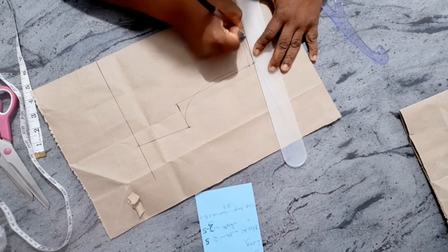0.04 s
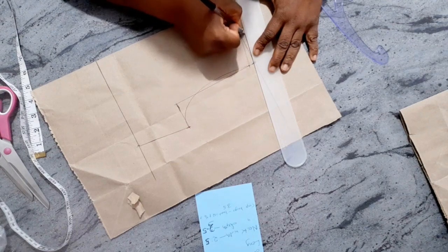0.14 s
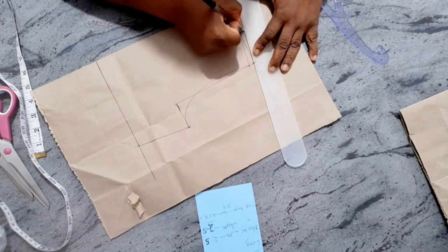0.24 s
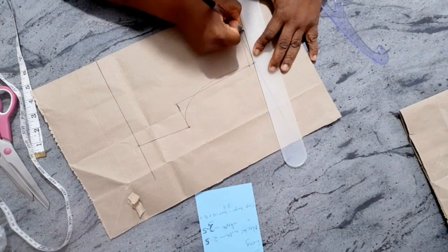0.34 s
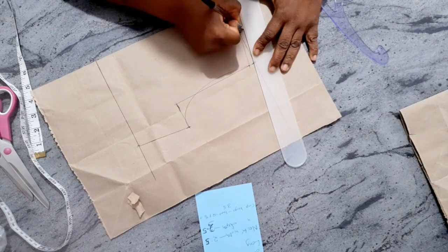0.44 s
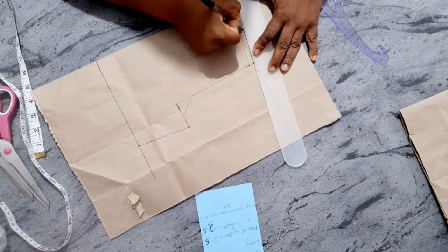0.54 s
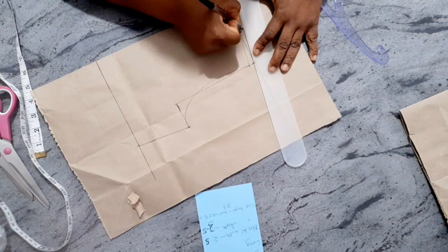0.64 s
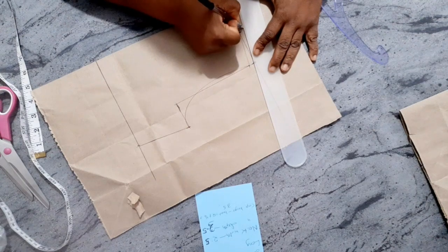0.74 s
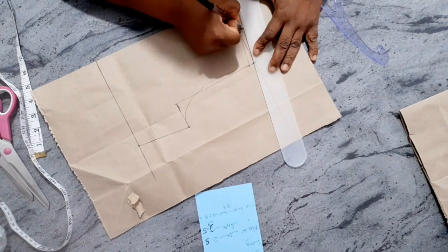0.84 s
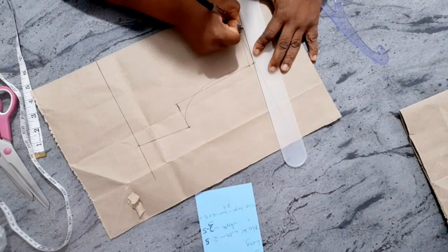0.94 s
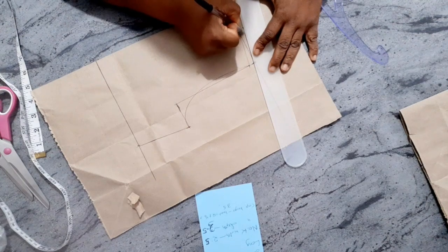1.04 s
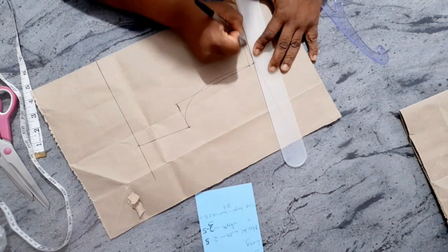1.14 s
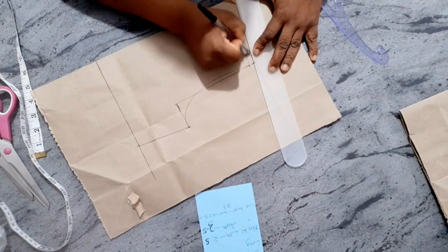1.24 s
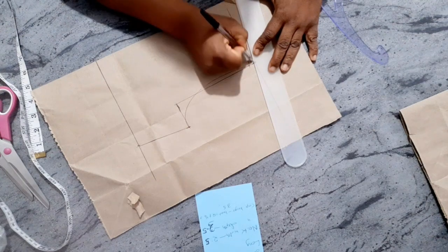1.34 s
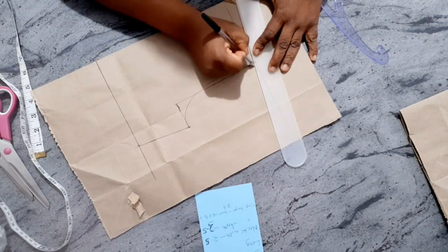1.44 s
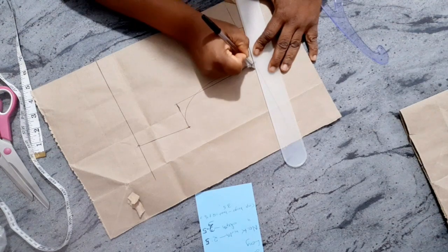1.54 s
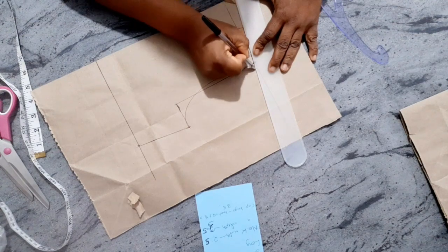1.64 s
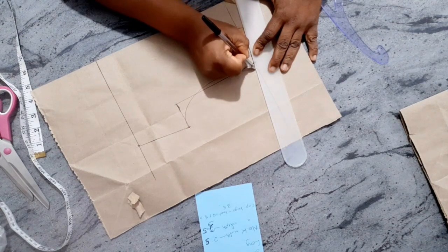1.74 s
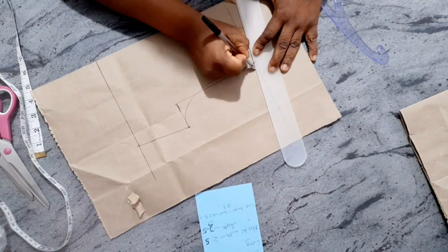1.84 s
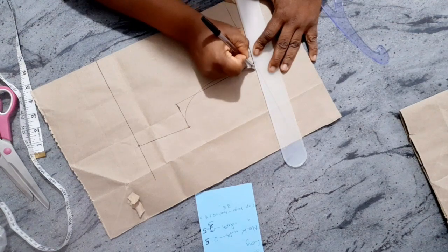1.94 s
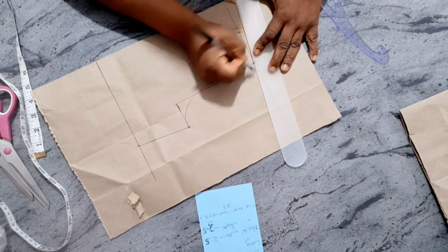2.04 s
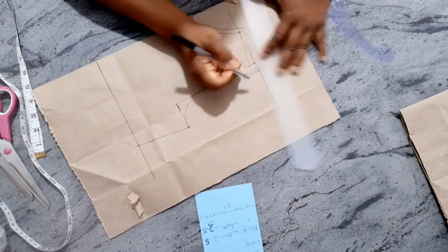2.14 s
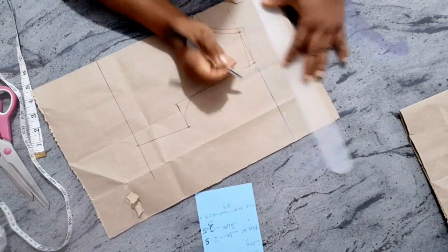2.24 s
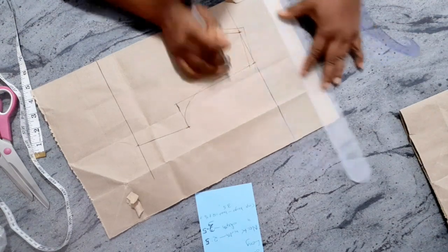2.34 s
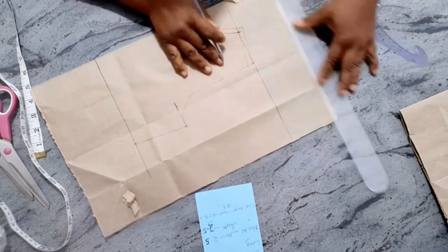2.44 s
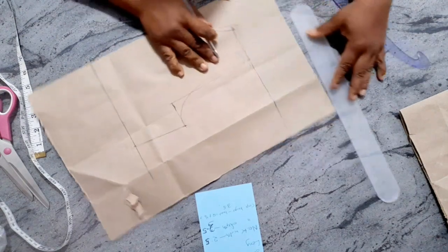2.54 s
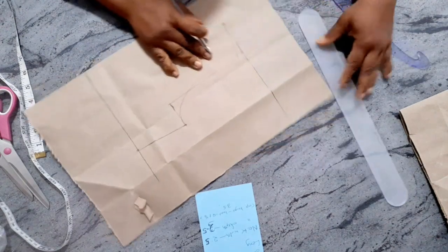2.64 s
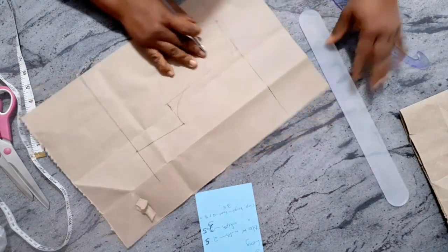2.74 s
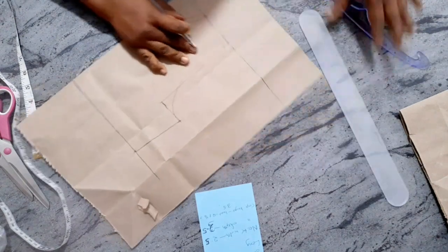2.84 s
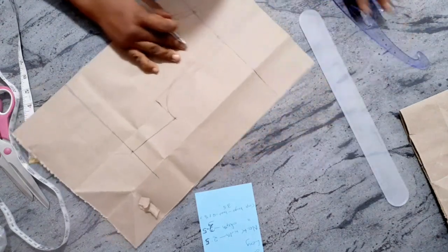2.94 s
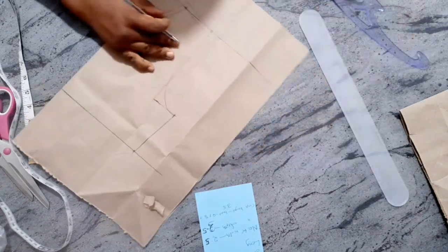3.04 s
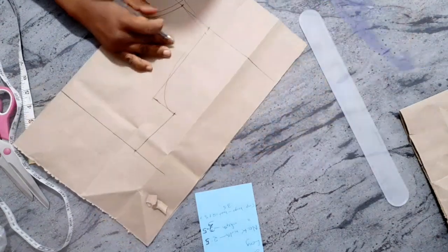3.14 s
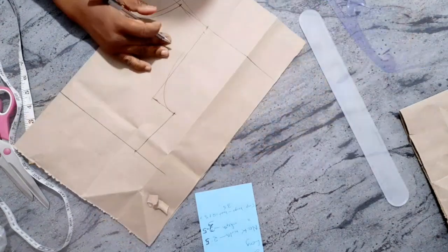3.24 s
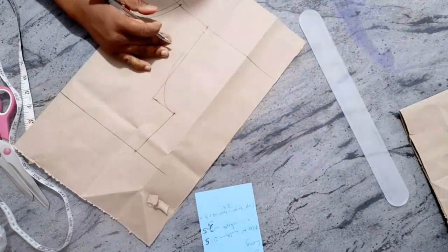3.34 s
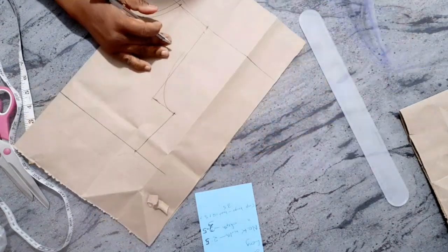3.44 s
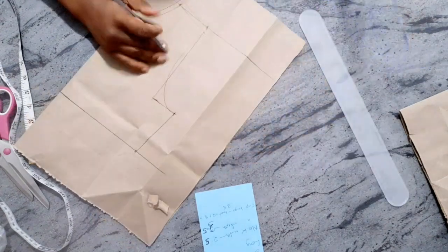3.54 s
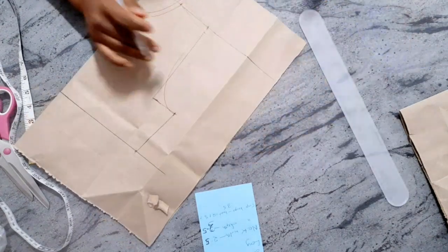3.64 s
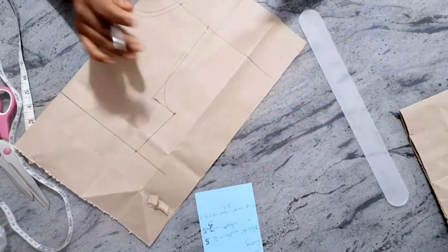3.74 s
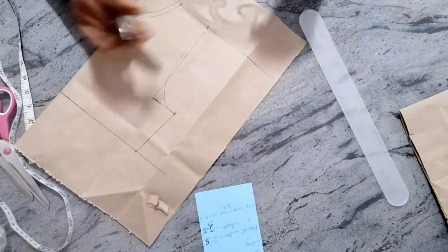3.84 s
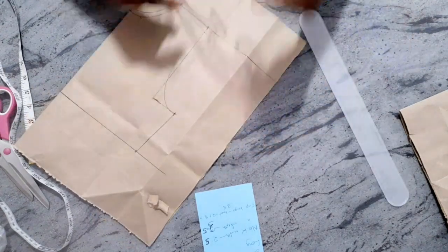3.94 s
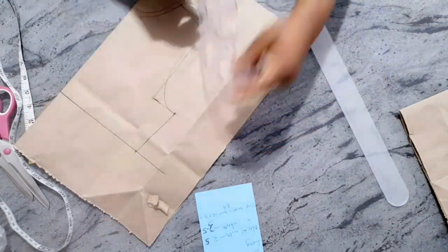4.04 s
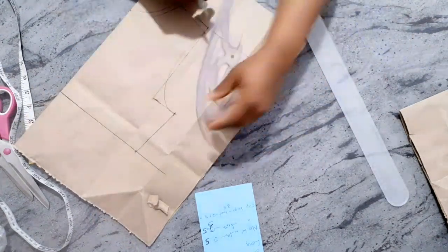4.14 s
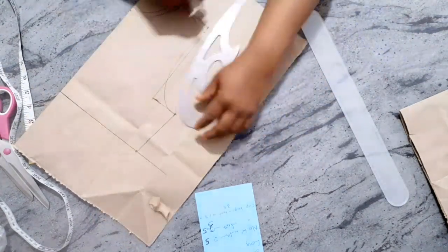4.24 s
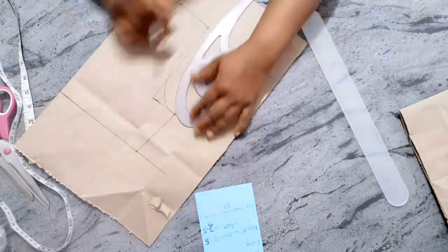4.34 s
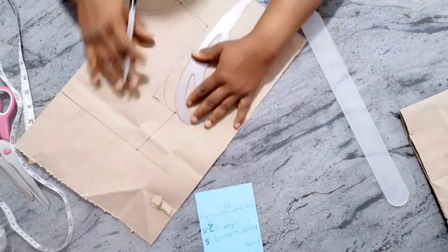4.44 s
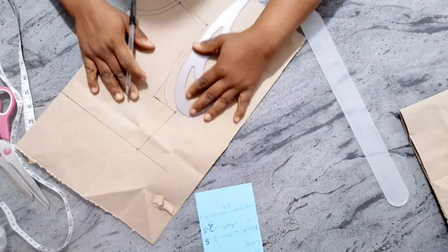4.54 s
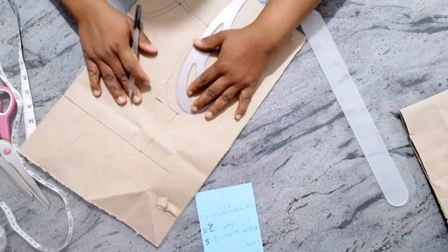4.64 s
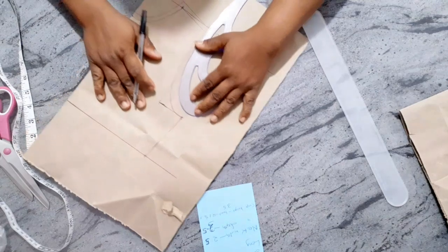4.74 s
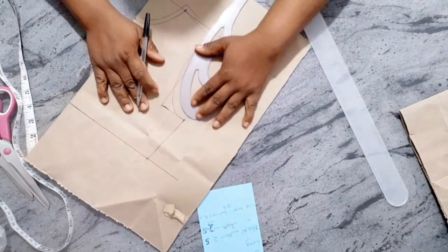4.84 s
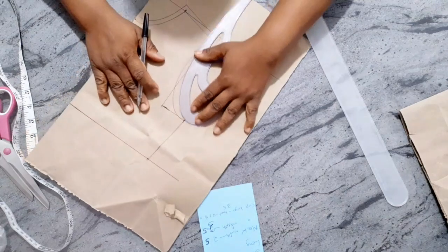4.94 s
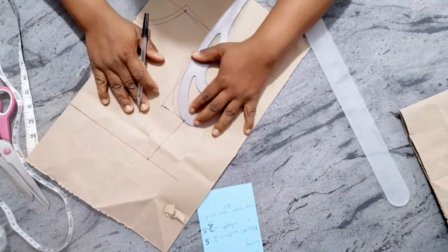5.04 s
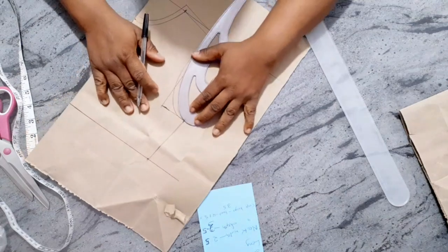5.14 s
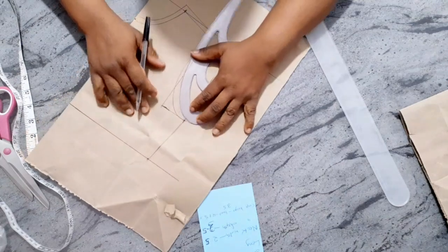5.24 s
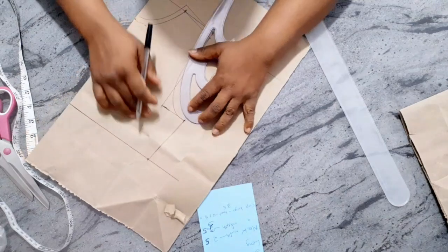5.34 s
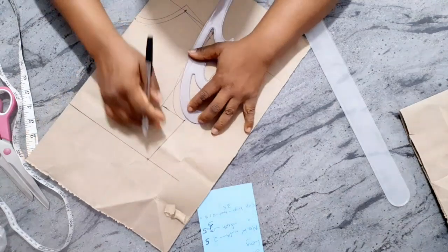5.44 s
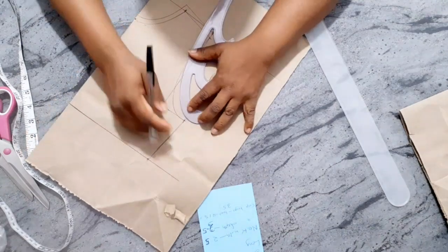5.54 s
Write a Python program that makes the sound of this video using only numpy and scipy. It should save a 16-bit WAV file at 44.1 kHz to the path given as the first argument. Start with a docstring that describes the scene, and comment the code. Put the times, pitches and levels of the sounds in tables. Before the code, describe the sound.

The sound is close, just above a stone table in a small room with faint steady background noise. After tiny paper and hand rubs, a pen draws along a ruler from about 1 to 1.6 seconds, a quiet, low scratch with soft thumps of a leaning hand. At 2.1 seconds brown paper starts sliding, with a crisp flick at 2.25, a brief ruler scrape and light knocks around 2.4 to 2.6. The rustle fades just after 3 seconds. Faint ticks and a small knock come near 3.5 and 3.7. From 4.15 to 4.3 seconds a plastic drawing curve lands on its edge, rattles and slaps flat, a bright clack and by far the loudest event. A cluster of duller knocks follows at 4.5, then a soft palm pat at 4.7. Hands gently smooth the paper, with one light pen click at 5.4 seconds.

```python
"""Pattern drafting on a stone table

A pen draws along a ruler, the ruler is pushed off, and hands turn and smooth the brown paper.
All this is stick-slip friction: dense tiny impulses, filtered by the bodies that they excite.
Pen and ruler knock lightly; loudest of all, a plastic curve clacks down and rings in its modes.
The scene is heard from just above the table, with the reverberation of a small room."""
import sys
import numpy as np
from scipy import signal
from scipy.fft import rfft, irfft, next_fast_len
from scipy.io import wavfile
from scipy.ndimage import uniform_filter1d

SR = 44100
rng = np.random.default_rng(int(sys.argv[2]) if len(sys.argv) > 2 else 0)


def bounce(signal):
    """Save signal as a 16-bit WAV file at the path given by the first command-line argument."""
    frames = np.transpose(np.atleast_2d(signal))
    limited = np.clip(frames, -1, 1)
    pcm = np.round(limited * 32767).astype(np.int16)
    wavfile.write(sys.argv[1], SR, pcm)


N = 246078
TIME = np.arange(N) / SR

# Spectral shapes, each normalised in use: (frequency [Hz], relative level [dB])
AIR_SPECTRUM = [(25, -19), (69, -12.5), (101, 3.5), (164, -11), (204, -3), (400, -7.5), (900, -11),
                (1710, -24.5), (2600, -21.5), (7500, -25), (9500, -33.5), (12500, -22), (15500, -24.5)]  # steady noise of the room
REVERB_SPECTRUM = [(60, 0.5), (280, -3.5), (600, 5.5), (2500, 4.5), (8000, 5.5), (15000, -9)]  # sound returned by the walls
HAND_SPECTRUM = [(40, -25.5), (75, -12), (130, -2.5), (200, -4.5), (340, -1.5), (480, -10.5), (700, -13),
                 (1300, -14.5), (4000, -56)]  # skin rubbing on the table
PALM_SPECTRUM = [(80, -13), (220, -18), (340, 4), (460, -11), (650, 5), (1100, -16), (4000, -31)]  # a palm striking paper
DRAG_SPECTRUM = [(30, -3), (65, 4), (130, 5), (170, -9), (220, 4.5), (500, 0), (750, -2), (1050, -3.5),
                 (1500, -11), (3000, -35)]  # rumble of the moving pen
TIP_SPECTRUM = [(1000, -10), (2200, 2.5), (4000, 2), (7500, 0.5), (9500, -1.5), (13000, 0), (15500, -3)]  # hiss at its tip
RUSTLE_SPECTRUM = [(700, -37), (1700, -11), (2500, 0.5), (4400, 2), (6000, -1), (8000, -3.5), (10000, -46),
                   (15500, -26)]  # the paper's surface
FIBRE_SPECTRUM = [(4000, -63.5), (7000, 0), (8500, 2), (10000, 0), (13000, 3.5), (15500, -4)]  # its fibres
CREASE_SPECTRUM = [(250, -16), (450, -5), (750, -2), (1050, -2.5), (1500, 0), (2100, -3), (3500, -22.5)]  # its folds
KNOCK_SPECTRUM = [(60, -23), (200, -21.5), (420, -17), (700, -12), (1100, -7.5), (1700, -4.5), (2700, -1.5),
                  (4000, -3.5), (7800, -8.5), (9500, -8), (15500, -36)]  # small objects touching the table
EDGE_SPECTRUM = [(60, -38), (250, -7), (550, -14), (1000, -12), (1800, 1.5), (2500, -11), (4300, 3.5),
                 (5500, 1), (7200, 2.5), (9500, 2), (13500, 5), (15500, -2)]  # the curve striking on its edge
FLAT_SPECTRUM = [(60, -7), (500, -5), (1800, 0.5), (2300, 13.5), (2900, 8), (4000, 7.5), (5000, -7),
                 (6400, 2), (8000, 7.5), (9200, -3), (11500, 3.5), (13300, 10), (14500, 1.5), (15500, -11)]  # the curve striking flat

# Resonances driven by friction: (frequency [Hz], bandwidth [Hz], relative level [dB])
BARREL_MODES = [(2670, 160, -2), (3740, 160, -3)]
RULER_BODY_MODES = [(332, 20, -7), (379, 18, 0), (431, 16, -9)]
RULER_EDGE_MODES = [(1153, 16, -0.5), (1440, 150, -20), (2515, 120, -1), (2820, 94, -7), (3230, 100, -15)]
# Modes of the plastic curve: (frequency [Hz], level struck on edge [dB], level struck flat [dB])
PLASTIC_MODES = [(850, -14, -24), (1184, -7, -15), (1335, -5, -18), (1614, -12, -14), (1873, -8, -17),
                 (2262, -13, 0), (2420, -16, -4), (2612, -12, -3), (2905, -12, 1), (3286, -3, -8),
                 (3596, -12, -9), (3836, -10, -4), (4112, -5, -10), (4306, -2, -14), (4608, -4, -22),
                 (6352, 1, -10), (6414, -8, -7), (6842, -1, -13), (7149, -3, -13), (7745, 0, -4),
                 (8110, -8, -8), (8292, -2, -11), (8695, -6, -13), (9960, -5, -13), (10486, -12, -11),
                 (10890, -5, -14), (11217, -2, -16), (11864, -6, -14), (13242, -10, -9), (13470, -4, -9)]

# Sliding movements: (time [s], duration [s], level [dB])
HAND_SHIFTS = [(-.06, 0.15, -56.5), (.2, 0.11, -61), (1.5, .14, -60.5), (1.75, .3, -62),
               (2.15, 0.49, -55.5), (2.96, .14, -51.5), (3.2, 0.15, -56), (3.62, 0.11, -61),
               (4.0, 0.077, -59.5), (4.25, 0.31, -53), (4.66, 0.096, -47.5), (4.9, 0.097, -60),
               (5.1, 0.4, -57.5)]  # hands shift their weight
PEN_MARKS = [(.16, 0.12, -72), (.48, .12, -73), (.72, 0.11, -70), (1.88, .13, -68)]  # small marks before and after the long line
# Soft impacts: (time [s], level [dB])
HAND_LEANS = [(1.071, -43), (1.251, -41), (1.327, -37.5), (3.007, -38.5)]  # a hand leans on the table
PALM_PATS = [(4.7, -43), (4.718, -41.5)]  # a palm pats the sheet
# The long line drawn along the ruler: (time [s], relative drag level [dB], relative hum level [dB])
PEN_LINE = [(0.98, -77, -68), (1.078, -54, -50.5), (1.202, -51, -42), (1.29, -46, -44), (1.31, -47.5, -46),
            (1.496, -60.5, -59), (1.512, -65, -72), (1.58, -68, -61)]
# Slides of the sheet: (time [s], duration [s], level [dB], fibre offset [dB], crease offset [dB])
PAPER_SLIDES = [(-.06, 0.14, -67, -7, -4), (0.6, .08, -72, -4, -20), (0.88, 0.063, -71.5, 2, -20),
                (2.0, 0.14, -65.5, -4, 0), (2.092, 0.21, -37, -3.5, -10.5), (2.302, 0.23, -37.5, -6, -1.5),
                (2.528, 0.31, -38, -5.5, -8), (2.804, .16, -39, -8, -7.5), (2.991, .14, -48.5, -12, 1),
                (3.182, 0.075, -54, -4, 6.5), (3.312, .06, -59, -4, 0), (3.522, 0.066, -53, -3, -5),
                (3.69, 0.14, -68.5, 0.5, -2), (4.001, 0.037, -48.5, -5, -16), (4.38, 0.25, -49, -5.5, -1.5),
                (4.605, 0.15, -42.5, -6.5, -3.5), (4.904, 0.082, -55.5, -6, -9.5),
                (5.133, 0.33, -57.5, -6.5, -6.5), (5.39, .17, -56, -4.5, -0.5)]
# Pen, ruler and fingers knock: (time [s], level [dB], contact cut-off [Hz], 60 dB decay time [s])
LIGHT_KNOCKS = [(1.65, -44.5, 700, .08), (2.091, -38, 4000, 0.061), (2.368, -25, 2500, 0.049),
                (2.526, -29, 2000, 0.025), (2.55, -21, 1960, .034), (3.651, -26.5, 1700, 0.055),
                (3.706, -40.5, 3000, .04), (4.012, -45, 9000, .05), (4.02, -37.5, 6000, .04),
                (4.512, -22, 1200, 0.11), (4.5315, -14, 2000, 0.051), (4.543, -22, 1500, .048),
                (4.5523, -18, 2600, 0.05), (4.616, -31.5, 3000, .02), (5.402, -20, 8150, 0.046)]
# The curve is picked up, then lands:
# (time [s], level [dB], flatness [0 on edge, 1 flat], contact cut-off [Hz])
CURVE_IMPACTS = [(3.462, -34, 0.1, 4500), (3.476, -31, 0.1, 4680), (4.1542, -15.5, 0.035, 17000),
                 (4.1569, -15.5, 0.05, 15000), (4.1654, -7, 0.1, 17100), (4.174, -13.5, 0.1, 9000),
                 (4.2206, -11.5, 0.23, 5870), (4.2488, -10, 0.19, 1690), (4.2704, -8, 0.92, 18100)]


def undb(db):
    """Amplitude ratio of a level in decibels."""
    return 10 ** (np.asarray(db) / 20)


def unit(x):
    """Normalisation to an rms of 1."""
    return x / np.sqrt(np.mean(x ** 2))


def decay(t, t60):
    """Exponential damping: 60 dB down after t60 seconds."""
    return np.exp(-np.log(1000) * t / t60)


def add(track, start_s, sound):
    """Superposition of a short sound on a stereo track."""
    start = int(start_s * SR)
    track[:, start:start + sound.shape[-1]] += sound[..., :N - start]


def colour(x, spectrum):
    """Minimum-phase filtering to a given spectral shape; white noise keeps its power."""
    size = next_fast_len(x.shape[-1] // 2 + 2048) * 2
    hz, db = np.transpose(spectrum)
    bin_hz = np.fft.rfftfreq(size, 1 / SR)
    gain = unit(undb(np.interp(np.log(bin_hz + 1), np.log(hz), db)))
    cepstrum = irfft(np.log(gain))
    cepstrum[1:size // 2] *= 2  # folding the cepstrum makes the filter causal
    cepstrum[size // 2 + 1:] = 0
    return irfft(rfft(x, size) * np.exp(rfft(cepstrum)))[..., :x.shape[-1]]


def soften(x, cutoff_hz, order=2):
    """Contact time acts as a low-pass filter: a softer contact lasts longer and loses treble."""
    return signal.sosfilt(signal.butter(order, cutoff_hz, fs=SR, output="sos"), x)


def resonate(force, modes):
    """Forced vibration: the responses of parallel resonators, summed and scaled to an rms of 1."""
    return unit(sum(undb(db) * signal.lfilter(*signal.iirpeak(hz, hz / width, SR), force)
                    for hz, width, db in modes))


def fluctuation(rate_hz):
    """Random modulation: Gaussian values joined by ramps, with an rms of 1."""
    step = max(int(SR / rate_hz), 1)
    held = np.repeat(rng.standard_normal(N // step + 1), step)[:N]
    return unit(uniform_filter1d(held, step))


def stereo(noises, correlation):
    """Partial coherence: of three noises, one is common to both channels and two are independent."""
    return np.sqrt(correlation) * noises[0] + np.sqrt(1 - correlation) * noises[1:]


def noise_burst(t, t60, correlation):
    """The dense, damped response to an impact, treated as decaying stereo noise."""
    return stereo(rng.standard_normal((3, len(t))), correlation) * decay(t, t60)


def friction(slips_per_s, spread_db, judder_db, judder_hz, correlation):
    """Stick-slip friction: random impulses of uneven size, modulated by the judder of the hand."""
    slips = rng.standard_normal((3, N)) * (rng.random((3, N)) < slips_per_s / SR)
    sizes = undb(spread_db * np.minimum(rng.exponential(size=(3, N)), 4))
    judder = undb(judder_db * fluctuation(judder_hz))
    return unit(stereo(slips * sizes, correlation) * judder)


def movement(start_s, length_s, attack_share=0.42, release_ratio=3.79):
    """Envelope of a slide: it gathers speed, holds and dies away, more slowly the longer it is."""
    attack = np.clip((TIME - start_s) / (attack_share * length_s), 0, 1) ** 2
    release = decay(np.maximum(TIME - start_s - length_s, 0), release_ratio * length_s)
    return attack * release


def movements(rows):
    """Incoherent addition: the envelopes of several slides add in power."""
    return np.sqrt(sum((undb(db) * movement(start, length)) ** 2 for start, length, db in rows))


def room_tone(level_db=-60.5):
    """Diffuse background noise: long waves reach both channels alike, short waves do not."""
    mid, side = colour(rng.standard_normal((2, N)), AIR_SPECTRUM)
    side = signal.sosfilt(signal.butter(1, 600, "high", fs=SR, output="sos"), side)
    gain = undb(level_db + 0.26 * fluctuation(8.8))
    return gain * (mid + undb(1.0) * side * np.array([[1], [-1]]))


def room(x, wet_db, t60=0.45):
    """Reverberation: wall reflections follow the direct sound as a separate tail in each channel."""
    t = TIME[:int(SR * .7)]
    tail = rng.standard_normal((2, len(t))) * decay(t, t60) * (t > .005)
    echoes = undb(wet_db) * colour(unit(tail), REVERB_SPECTRUM) / np.sqrt(len(t))
    direct = np.array([np.pad(x[0], (3, 0))[:N], x[1]])  # reaches the right channel first
    return direct + signal.fftconvolve(x, echoes, axes=1)[:, :N]


def hands(table_hz=133.7, table_t60=0.18):
    """Skin rubs by friction, and a leaning hand sets one low mode of the table in free vibration."""
    slips = friction(1500, spread_db=1.0, judder_db=2.5, judder_hz=30, correlation=0.9)
    out = movements(HAND_SHIFTS) * colour(slips, HAND_SPECTRUM)
    t = TIME[:SR // 2]
    soft_onset = 1 - decay(t, 0.028)
    boom = np.sin(2 * np.pi * table_hz * t) * decay(t, table_t60) * soft_onset
    for start, db in HAND_LEANS:
        add(out, start, undb(db) * boom)
    return out


def palm_pats():
    """A compliant impact, flesh on paper, excites mainly low frequencies: a short, dull puff."""
    out, t = np.zeros((2, N)), TIME[:SR // 3]
    for start, db in PALM_PATS:
        puff = colour(noise_burst(t, t60=0.17, correlation=0.99), PALM_SPECTRUM)
        add(out, start, undb(db) * puff)
    return out


def pen_marks():
    """Faint friction at the tip drives the resonances of the pen's barrel."""
    slips = friction(2800, spread_db=2.5, judder_db=0.5, judder_hz=22, correlation=0.66)
    return movements(PEN_MARKS) * resonate(slips, BARREL_MODES)


def pen_stroke(drag_gain_db=5, hiss_gain_db=-1, hum_gain_db=1.5):
    """Friction of the ballpoint on paper over stone rumbles, hisses and drives the ruler's modes."""
    times, drag_db, hum_db = np.transpose(PEN_LINE)
    drag_slips = friction(4000, spread_db=-0.5, judder_db=0.7, judder_hz=60, correlation=0.83)
    tip_slips = friction(20000, spread_db=1.5, judder_db=1.6, judder_hz=110, correlation=0.13)
    ruler_slips = friction(5600, spread_db=2.0, judder_db=1.5, judder_hz=70, correlation=1.0)
    rumble = undb(drag_gain_db) * colour(drag_slips, DRAG_SPECTRUM)
    hiss = undb(hiss_gain_db) * colour(tip_slips, TIP_SPECTRUM)
    drag = undb(np.interp(TIME, times, drag_db)) * (rumble + hiss)
    hum = undb(np.interp(TIME, times, hum_db) + hum_gain_db) * resonate(ruler_slips, RULER_BODY_MODES)
    drawing = (TIME > times[0]) & (TIME < times[-1])
    return drawing * (drag + hum)


def ruler_scrape(hum_db=-41.5, chatter_db=-33.5):
    """Forced vibration of the ruler pushed on to the stone: its body hums and its edge chatters."""
    body_slips = friction(2000, spread_db=2.5, judder_db=3.0, judder_hz=50, correlation=1.0)
    edge_slips = friction(2800, spread_db=3.0, judder_db=3.0, judder_hz=57, correlation=0.34)
    hum = movement(start_s=2.285, length_s=.28) * resonate(body_slips, RULER_BODY_MODES)
    chatter = movement(start_s=2.325, length_s=0.13) * resonate(edge_slips, RULER_EDGE_MODES)
    return undb(hum_db) * hum + undb(chatter_db) * chatter


def paper_slides():
    """Sliding friction in three bands: the surface rustles, fibres hiss, folds drag lower down."""
    starts, lengths, db, fibre_db, crease_db = np.transpose(PAPER_SLIDES)
    surface = friction(16000, spread_db=1.0, judder_db=2.0, judder_hz=70, correlation=0.093)
    fibres = friction(25000, spread_db=2.0, judder_db=1.3, judder_hz=90, correlation=0.16)
    folds = friction(4000, spread_db=1.0, judder_db=1.6, judder_hz=73, correlation=0.45)
    rustle = movements(zip(starts, lengths, db)) * colour(surface, RUSTLE_SPECTRUM)
    hiss = movements(zip(starts, lengths, db + fibre_db)) * colour(fibres, FIBRE_SPECTRUM)
    creasing = movements(zip(starts, lengths, db + crease_db)) * colour(folds, CREASE_SPECTRUM)
    return undb(3.0) * rustle + undb(6.5) * hiss + undb(1.5) * creasing


def paper_flick(start_s=2.2535, level_db=-14.5):
    """Sudden release: the paper's edge slips from under the ruler with a brief, bright transient."""
    out, t = np.zeros((2, N)), TIME[:SR // 4]
    burst = noise_burst(t, t60=.016, correlation=0.49)
    flick = colour(burst, [(1500, -24), (5000, -4), (8500, 11), (12000, -7), (15500, -7)])
    add(out, start_s, undb(level_db) * flick)
    return out


def knocks():
    """Heavily damped impacts: small plastic things touch the table and the hand absorbs their ring."""
    out, t = np.zeros((2, N)), TIME[:SR // 4]
    for start, db, contact_hz, t60 in LIGHT_KNOCKS:
        knock = colour(noise_burst(t, t60, correlation=0.42), KNOCK_SPECTRUM)
        add(out, start, undb(db) * soften(knock, contact_hz, order=1))
    return out


def curve_clacks(ring_t60=0.11, crack_t60=0.14, snap_t60=.004):
    """Modal vibration: the curve lands on edge, rattles and slaps flat; contact weights its modes."""
    out, t = np.zeros((2, N)), TIME[:SR // 2]
    hz, edge_db, flat_db = np.transpose(PLASTIC_MODES)
    fades = decay(t, ring_t60 * (hz[:, None] / 4000) ** -.1)  # higher modes die sooner
    channel_phases = 1.2 * rng.standard_normal((2, len(hz), 1))  # each mode radiates its own way
    for start, db, flatness, contact_hz in CURVE_IMPACTS:
        phases = rng.uniform(0, 2 * np.pi, (len(hz), 1)) + channel_phases
        amplitudes = undb(edge_db + flatness * (flat_db - edge_db))
        ring = amplitudes @ (fades * np.sin(2 * np.pi * hz[:, None] * t + phases))
        dense_modes = noise_burst(t, crack_t60, correlation=0.13)
        snap = undb(8.5) * rng.standard_normal(len(t)) * decay(t, snap_t60)
        burst = dense_modes + snap
        crack = (1 - flatness) * colour(burst, EDGE_SPECTRUM) + flatness * colour(burst, FLAT_SPECTRUM)
        clack = soften(undb(-4) * crack + undb(-13) * ring, contact_hz)
        add(out, start, undb(db) * clack)
    return out


def scene():
    """Superposition of the reverberant friction and impact sounds on the room's background noise."""
    drafting = pen_stroke() + pen_marks() + ruler_scrape() + paper_slides() + paper_flick()
    rubbing = room(drafting + hands() + palm_pats(), wet_db=-8.5)
    knocking = room(curve_clacks() + knocks(), wet_db=-7.5)
    balance = undb([[-.8], [.5]])  # left, right
    return (rubbing + knocking + room_tone()) * balance


def record(dry, low_hz=38, top_hz=15700):
    """Band limiting and saturation: the microphone thins deep bass, clips and cuts the top."""
    highpass = signal.butter(2, low_hz, "high", fs=SR, output="sos")
    lowpass = signal.ellip(8, .2, 70, top_hz, fs=SR, output="sos")
    clipped = np.clip(signal.sosfilt(highpass, dry), -1, 1)
    return signal.sosfilt(lowpass, clipped)


dry = scene()
out = record(dry)
bounce(out)
```